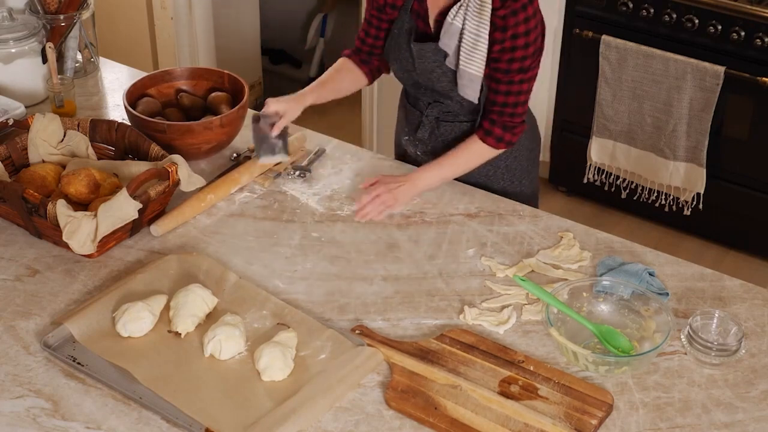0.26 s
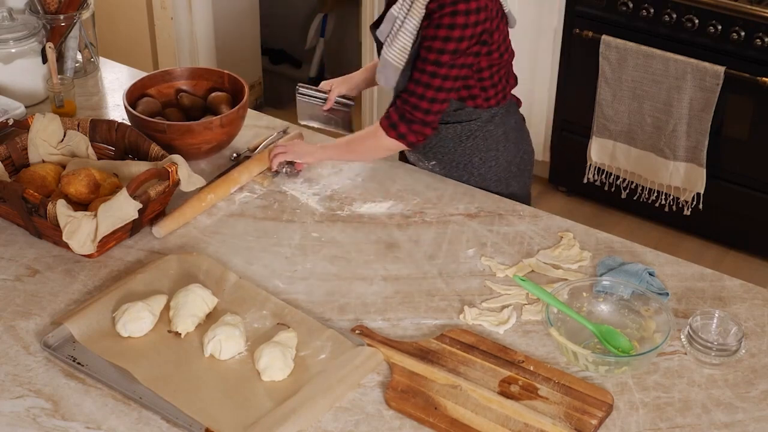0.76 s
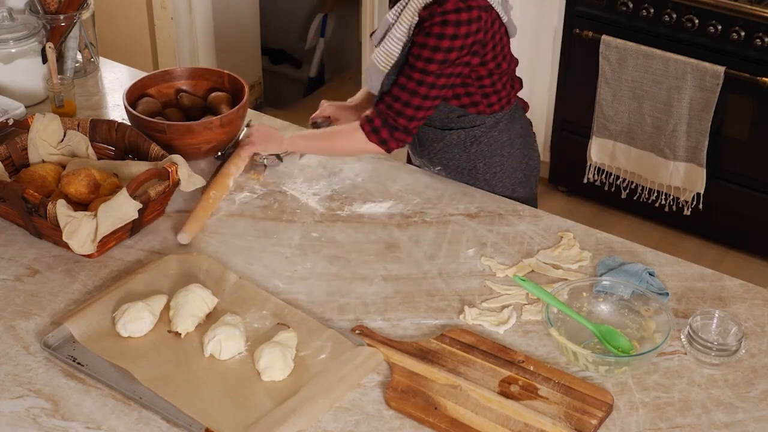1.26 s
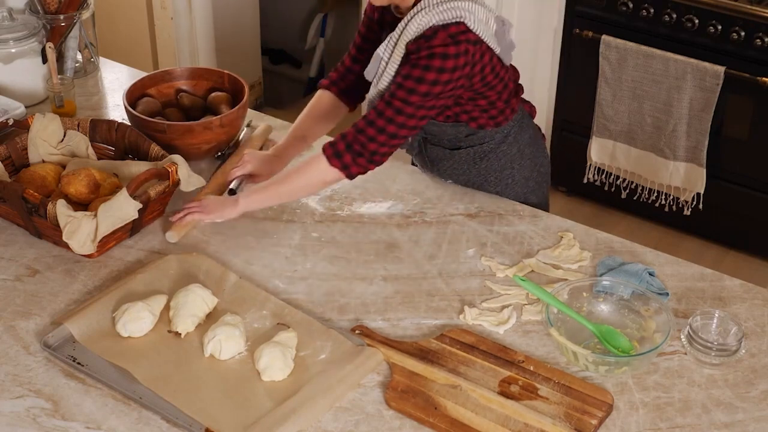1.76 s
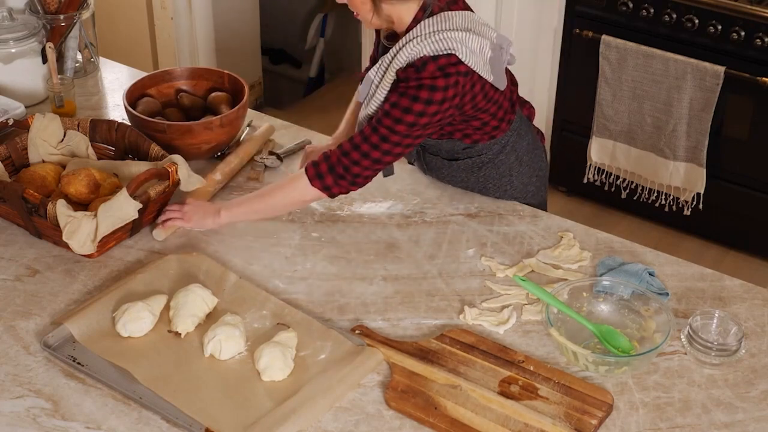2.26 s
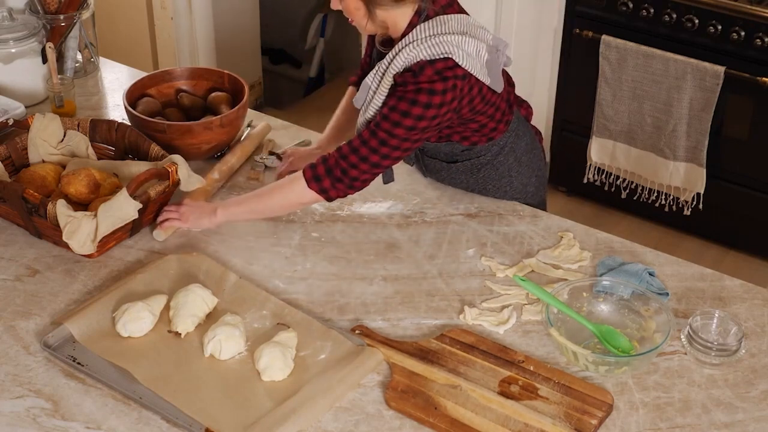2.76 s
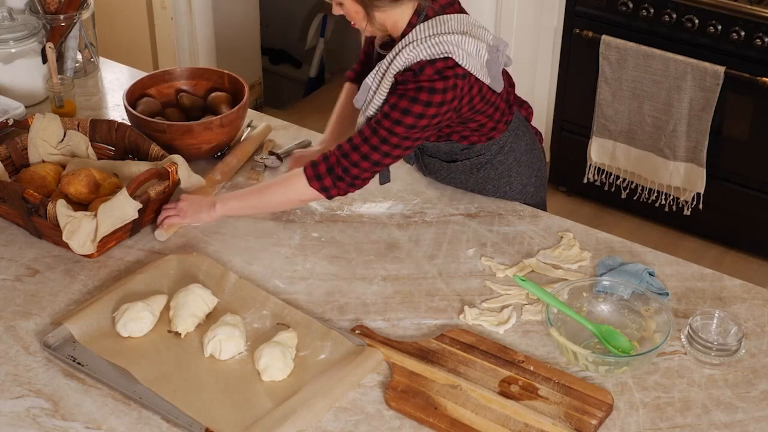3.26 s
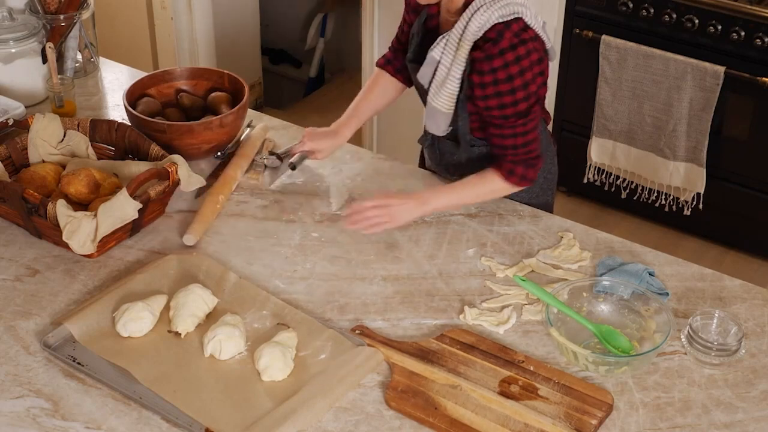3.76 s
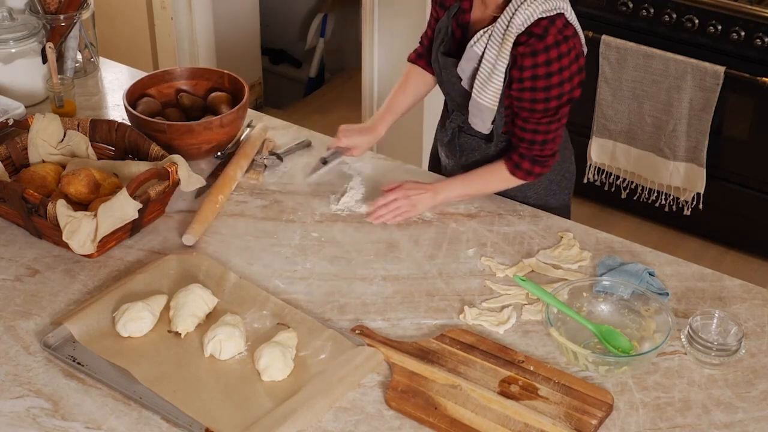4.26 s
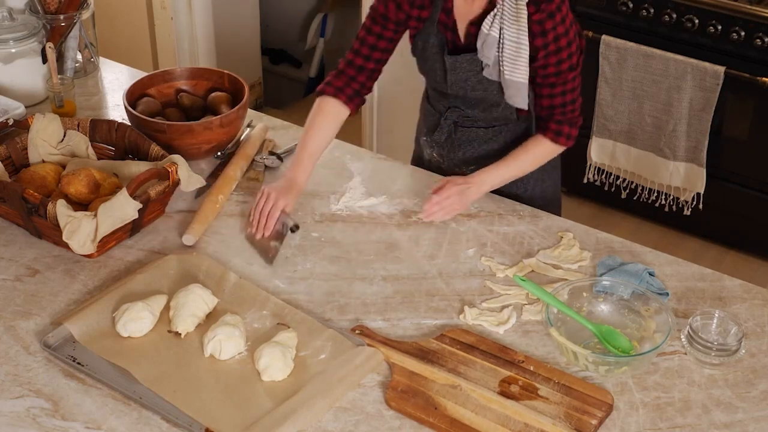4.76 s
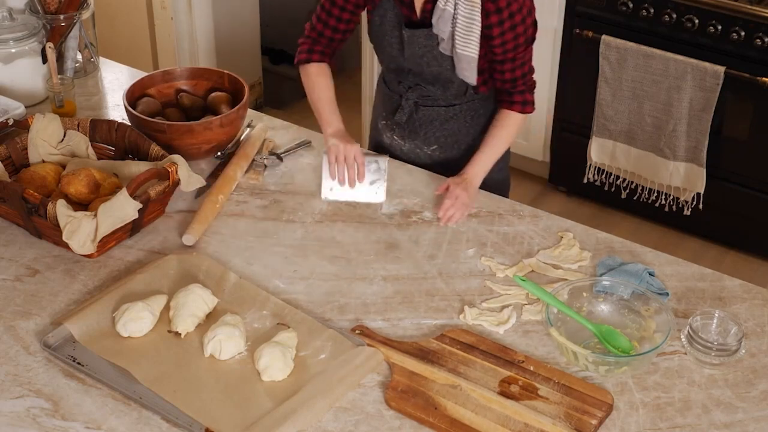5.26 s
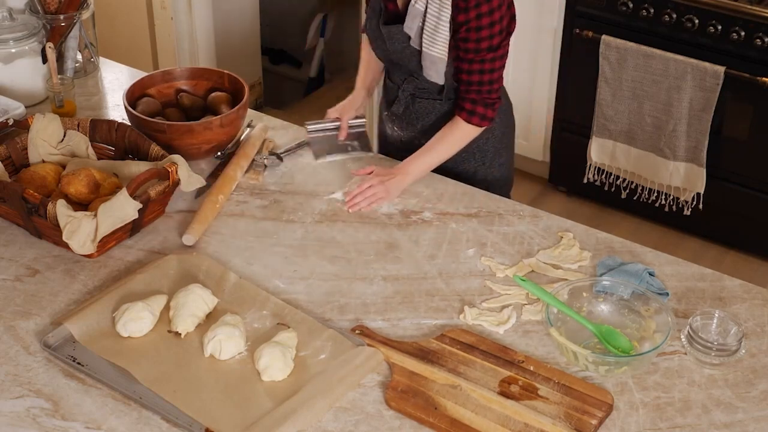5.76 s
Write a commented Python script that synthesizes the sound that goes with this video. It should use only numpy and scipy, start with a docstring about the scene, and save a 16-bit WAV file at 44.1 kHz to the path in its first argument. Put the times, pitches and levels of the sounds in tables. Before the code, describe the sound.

Faint scraping and ticks, one loud woody knock with a steel clink, then sharp metallic clacks and gritty flour scrapes over a low appliance hum.

```python
"""Bench scraper on a stone countertop

A steel blade gathers flour in a small kitchen: modal clacks, corner then edge, precede hissing drags.
The drags are friction noise, made of random micro-slips that also excite the modes of the pressed blade.
A wooden rolling pin gives a hollow modal knock with a clink of steel; ticks, bumps and squeaks fall between.
An appliance hums underneath, and a dense decaying reverberation joins all the work on the counter."""
import sys
import numpy as np
from scipy import signal
from scipy.fft import rfft, irfft
from scipy.io import wavfile
from scipy.ndimage import uniform_filter1d

SR = 44100
rng = np.random.default_rng(int(sys.argv[2]) if len(sys.argv) > 2 else 0)


def waveform_to_disk(signal):
    """Save audio, clipped to [-1, 1], as 16-bit WAV at the path in sys.argv[1]."""
    frames = np.transpose(np.atleast_2d(signal))
    scaled = np.clip(frames, -1, 1) * 32767
    samples = np.round(scaled).astype(np.int16)
    wavfile.write(sys.argv[1], SR, samples)


N = 265077
HALF = SR // 2  # samples in half a second, the length of every struck sound
T = np.arange(HALF) / SR  # its time axis, s
EDGE_HZ = 15900  # upper band limit


def amp(db):
    """Level law: decibels to amplitude gain."""
    return 10 ** (np.asarray(db) / 20)


def unit(x):
    """Normalisation: scales to rms 1."""
    return x / np.sqrt(np.mean(x ** 2) + 1e-20)


def read(points, hz):
    """Interpolation: reads a table on a log-frequency axis, held constant beyond its ends."""
    f, value = np.transpose(points)
    return np.interp(np.log(hz + 1), np.log(f + 1), value)


def add(mix, s, sound):
    """Superposition: adds a sound to the mix in place, from time s."""
    part = mix[round(s * SR):][:len(sound)]
    part += sound[:len(part)]


def colour(x, spectrum, tilt_db=0):
    """Spectral shaping: filters x, with a tilt in dB per octave above 300 Hz; rms 1."""
    hz = np.fft.rfftfreq(len(x), 1 / SR)
    gain_db = read(spectrum, hz) + tilt_db * np.log2(np.maximum(hz, 300))
    return unit(irfft(rfft(x) * amp(gain_db), len(x)))


def die_away(x, t60s):
    """Frequency-dependent damping: each band of x decays at its own rate."""
    hz, t, z = signal.stft(x, SR, nperseg=256)
    decay = amp(-60 * t / read(t60s, hz)[:, None])
    return signal.istft(z * decay, SR, nperseg=256)[1][:len(x)]


def fade(t60):
    """Exponential decay: a fall of 60 dB in t60 seconds."""
    return 1000. ** (-T / t60)


def noise():
    """Broadband excitation: half a second of white noise."""
    return rng.standard_normal(HALF)


def ring(modes, tilt_db=0, length=1):
    """Modal synthesis: damped sines of a struck body, tilted in dB per octave about the median mode."""
    middle = np.median(modes, axis=0)[0]
    out = np.zeros(HALF)
    for hz, db, t60 in modes:
        level = amp(db + tilt_db * np.log2(hz / middle))
        out += level * fade(t60 * length) * np.sin(2 * np.pi * (hz * T + rng.random()))
    return out


def shimmer(t60, low_hz=2200, count=70):
    """Modal crowding: random lines for the upper modes of thin steel, rms 1 before the decay."""
    lines = np.zeros(HALF // 2 + 1, complex)
    place, phase = rng.random((2, count))
    bins = ((low_hz + place * (EDGE_HZ - low_hz)) * HALF / SR).astype(int)
    lines[bins] = rng.random(count) ** 2 * np.exp(2j * np.pi * phase)
    return unit(irfft(lines, HALF)) * fade(t60)


def grit(per_s, spread_db, smooth):
    """Micro-slip friction: many tiny slips of uneven size over a smooth rub."""
    sizes = amp(spread_db * np.minimum(rng.exponential(1, N), 4)) * rng.choice([-1, 1], N)
    slips = unit(sizes * (rng.random(N) < per_s / SR))
    return unit(slips + smooth * rng.standard_normal(N))


def wander(x, depth_db):
    """Moving contact: narrow resonances come and go as it slides along the edge; depth is rms."""
    z = signal.stft(x, SR, nperseg=1024, noverlap=768)[2]
    patches = uniform_filter1d(rng.standard_normal(z.shape), size=3, axis=0)  # across frequency
    patches = unit(uniform_filter1d(patches, size=24, axis=1))  # across time
    return unit(signal.istft(z * amp(depth_db * patches), SR, nperseg=1024, noverlap=768)[1][:N])


# relative spectrum of the kitchen's background: f/Hz, density level/dB
AIR = [(10, -73), (28, -4.5), (55, -5), (90, -15.5), (140, -17.5), (200, -19.5), (450, -20), (1000, -29),
       (2500, -37), (10000, -42), (16000, -43.5)]


def background(hum_hz=120, hum_db=-58, waver_db=2, air_db=-54, drift=0.0204):
    """Amplitude and frequency modulation: a wavering mains hum over low rumble and faint hiss."""
    swell, sway = (unit(uniform_filter1d(x, size=4000)) for x in rng.standard_normal((2, N)))
    turns = np.cumsum(hum_hz * (1 + drift * sway)) / SR
    hum = np.sqrt(2) * amp(waver_db * swell) * np.sin(2 * np.pi * turns)
    air = colour(rng.standard_normal(N), AIR)
    return amp(air_db) * air + amp(hum_db) * hum


ATTACK_S, RELEASE_S = 0.023, 0.023  # the edge settles on the stone and lifts off it
SPEED_POWER = 1.46  # how pointed the arch of speed is
RASP_FOLLOWS = 0.71  # share of the swell that the rasp follows


def stroke(start, length, fastest, hiss_db, rasp_db, swell_db):
    """Speed dependence: hiss and rasp follow the hand as it speeds up and slows. Returns both gains."""
    t = np.arange(N) / SR - start
    arch = np.interp(t / length, [0, np.clip(fastest, .05, .95), 1], [0, np.pi / 2, np.pi])
    slow_db = swell_db * (abs(np.sin(arch)) ** SPEED_POWER - 1)  # 0 dB where the hand is fastest
    touch = np.clip(t / ATTACK_S, 0, 1) * np.exp(-np.maximum(t - length, 0) / RELEASE_S)
    return touch * amp([hiss_db + slow_db, rasp_db + RASP_FOLLOWS * slow_db])


# strokes of the blade: start t/s, length t/s, share of the length at which it moves fastest,
#   flour hiss level/dB and edge rasp level/dB (each before its common trim),
#   swell from the ends to the fastest point level/dB (negative: a dip; the rasp takes a share)
STROKES = [(0.0, 0.35, 0.77, -56, -57, 8), (0.997, 0.22, 0.41, -51.5, -52.5, 5),
           (1.371, 0.21, 0.87, -66, -65, -9), (1.853, 0.15, 0.17, -61.5, -53, 8.5),
           (2.069, 0.24, 0.8, -32, -41, 17), (2.686, .15, 0.84, -36.5, -41, 8.5),
           (3.114, 0.38, 0.56, -34.5, -42, 10.5), (3.776, 0.27, .68, -38, -48.5, 4),
           (4.233, 0.18, 0.65, -34.5, -43.5, 10), (4.804, 0.063, .4, -52, -43, -2),
           (4.921, 0.33, 0.79, -33, -42, 8), (5.251, 0.17, .15, -51, -51, 9),
           (5.464, .23, 0.67, -56, -57.5, 3.5), (5.847, 0.22, .7, -56.5, -60, 5.5)]
# relative spectra of flour hiss and edge rasp: f/Hz, density level/dB
HISS = [(1500, -11), (2800, -7), (4500, -4), (5300, -4.5), (6200, -3), (7500, -7.5), (10000, -2.5),
        (12500, -1.5), (16000, -8.5)]
RASP = [(150, -8.5), (350, -12.5), (700, -4), (900, -5), (1130, -2.5), (1400, -1.5), (1750, -7.5),
        (2300, -6), (3700, -11), (7000, -20), (16000, -54)]
# modes of the blade while pressed and dragged: f/Hz, relative level/dB, t60 t/s
PRESSED = [(1081, -7.5, 0.14), (1108, -5, 0.059), (1214, -8, 0.047), (1275, -4.5, 0.075), (2670, -27, 0.04),
           (3465, -6.5, 0.14), (3830, -18, 0.074)]


def strokes(judder_db=0.92, sing=0.36, flour_db=-2.5, edge_db=-1):
    """Friction-driven resonance: flour hisses, and the edge catches on stone and makes the blade sing."""
    hiss_gain, rasp_gain = sum(stroke(*row) for row in STROKES)
    # slow random unevenness of level, mostly below 100 Hz
    judder_shape = colour(rng.standard_normal(N), [(10, 0), (80, 0), (300, -30), (2000, -70)])
    judder = amp(judder_db * judder_shape)
    hiss = wander(colour(grit(per_s=7000, spread_db=0.5, smooth=0.82), HISS), depth_db=4.0)
    slips = grit(per_s=1600, spread_db=1.0, smooth=0.63)
    blade = unit(signal.fftconvolve(slips, ring(PRESSED))[:N])
    rasp = wander(colour(slips, RASP) + sing * blade, depth_db=6.0)
    return judder * (amp(flour_db) * hiss_gain * hiss + amp(edge_db) * rasp_gain * rasp)


# brief squeaks of the edge: middle t/s, length t/s, level/dB, mean pitch f/Hz
SQUEAKS = [(0.047, 0.089, -56, 1570), (0.294, 0.088, -57, 1550), (4.434, .06, -41.5, 936),
           (5.796, 0.037, -53, 1570)]


def squeaks(jitter=0.034, overtone_db=-9):
    """Stick-slip oscillation: an unevenly wavering pitch with three weaker overtones."""
    out = np.zeros(N)
    for s, length, db, hz in SQUEAKS:
        size = round(length * SR)
        waver = unit(uniform_filter1d(noise(), size=60))[:size]
        turns = np.cumsum(hz * (1 + jitter * waver)) / SR
        tone = sum(amp(overtone_db * k) * np.sin(2 * np.pi * (k + 1) * turns) for k in range(4))
        add(out, s - length / 2, amp(db) * unit(tone) * np.hanning(size))
    return out


# light ticks of handled steel and crumbs: t/s, level/dB, t60 t/s (of the noise)
TICKS = [(0.2534, -47.5, 0.035), (0.289, -41.5, 0.02), (0.455, -47, 0.0046), (0.6872, -41, 0.13),
         (0.717, -45, 0.083), (0.746, -43.5, 0.066), (0.7635, -36.5, 0.069), (.838, -48, 0.053),
         (1.193, -43, 0.11), (1.2036, -28.5, 0.011), (1.881, -53.5, 0.041), (1.9655, -54, 0.014),
         (2.634, -38.5, .015), (3.7188, -47, 0.056)]
# their relative spectrum: f/Hz, density level/dB
TICK = [(300, 13), (1500, -5), (3500, 2.5), (6500, 5.5), (9000, 5), (12500, 3), (16000, -13)]


def ticks(shimmer_db=-10):
    """Impulsive excitation: bright noise bursts, with a trace of steel that rings twice as long."""
    out = np.zeros(N)
    for s, db, t60 in TICKS:
        burst = colour(noise(), TICK) * fade(t60)
        steel = amp(shimmer_db) * shimmer(2 * t60)
        add(out, s, amp(db) * (burst + steel))
    return out


# soft bumps of hand and dough on the counter: t/s, level/dB, pitch f/Hz
BUMPS = [(.29, -37, 39.5), (1.698, -41, 168), (2.081, -40.5, 46.6), (1.203, -33.5, 233), (2.606, -32, 328),
         (4.645, -44.5, 677), (4.665, -32, 168), (4.689, -51, 194), (4.85, -40.5, 162), (5.784, -34.5, 270)]


def bumps(body=0.56):
    """Heavily damped impact: a dull puff of noise around a sine at the same pitch."""
    out = np.zeros(N)
    for s, db, hz in BUMPS:
        puff = colour(noise(), [(hz / 4, -24), (hz, 0), (hz * 2, -13), (hz * 10, -50)])
        thud = unit(puff + body * np.sqrt(2) * np.sin(2 * np.pi * hz * T))
        soft_attack = 1 - np.exp(-T / 0.0021)
        add(out, s, amp(db) * thud * soft_attack * fade(t60=.12))
    return out


# clinks of a steel utensil lying against the pin: t/s, level/dB, brightness level/dB per octave
CLINKS = [(0.6883, -53, 3), (0.905, -34.5, 14), (1.2036, -38.5, 1.5)]
# its modes: f/Hz, relative level/dB (before the brightness), t60 t/s
UTENSIL = [(2740, -4, 0.19), (3217, -1.5, 0.34), (5500, -0.5, 0.067), (6800, -11, 0.17), (9680, -9, 0.13),
           (10600, -12, 0.16), (10800, -21, .2), (12800, -14, 0.14)]


def utensil():
    """Lightly damped modes: the steel utensil rings as the pin jogs it."""
    out = np.zeros(N)
    for s, db, tilt_db in CLINKS:
        add(out, s, amp(db) * ring(UTENSIL, tilt_db))
    return out


# rolling pin knocks: t/s, ring level/dB, clatter level/dB, time until the hand stills the ring t/s
KNOCKS = [(0.766, -41.5, -40, 0.021), (0.9013, -35, -37, 0.009), (0.9038, -15, -27, 0.048),
          (1.2024, -43, -36, 0.045), (1.238, -48, -37.5, 0.048)]
# bending modes of the pin: f/Hz, relative level/dB, t60 t/s (while undamped)
PIN = [(811, 0.5, 0.087), (1786, -6.5, 0.23), (3030, -23, 0.11), (4440, -33, 0.18), (4900, -16.5, 0.052)]
# relative spectrum of its clatter: f/Hz, density level/dB
PIN_CLATTER = [(80, 1), (250, -5), (800, 8), (1400, -4.5), (2600, -7), (5000, -9.5), (7500, -20.5),
               (11000, -15.5), (16000, -27)]


def rolling_pin(still=0.0047):
    """Bending modes under added damping: the wooden bar rings over a clatter until the hand stills it."""
    out = np.zeros(N)
    for s, ring_db, clatter_db, free in KNOCKS:
        clatter = colour(noise(), PIN_CLATTER) * fade(t60=0.15)
        damped = np.exp(-np.maximum(T - free, 0) / still)  # time constant in s
        add(out, s, amp(ring_db) * ring(PIN) * damped + amp(clatter_db) * clatter)
    return out


# blade landings, corner first: t/s, level/dB, brightness level/dB per octave,
#   ring of the modes level/dB (before the trims of ring and shimmer),
#   factor on the decay times of clack and modes (low when dough cushions the blade),
#   delay of the whole edge t/s, its level against the corner/dB, its extra brightness level/dB per octave
LANDINGS = [(1.8061, -31, -8, -14, 0.6, 0.012, 6, 2.5), (2.6047, -30, -2.5, -4, 0.38, 0.0017, 9, -2),
            (3.0462, -16, -1, -2.5, 0.63, .0092, -3, 0), (3.7517, -15, 0.94, -4.5, 0.81, .0079, 1, -1.6),
            (4.217, -18.5, -0.5, -5, 0.77, .0115, 0.5, 3), (4.801, -36, -4, -4.5, 1.3, .046, -13, -5.5),
            (5.7836, -44, -7.5, -11, 1.08, .012, -7, 0)]
# modes of the blade as it strikes the stone: f/Hz, relative level/dB (before the brightness),
#   t60 t/s (before the landing's factor)
BLADE = [(215.7, -16, 0.38), (313, -16, 0.11), (492, -8, 0.28), (980, -10.5, 0.3), (1045, 0, 0.16),
         (1162, -0.5, 0.053), (1303, -3, 0.13), (1392, -4, 0.12), (1452, -3, 0.096), (1618, -6.5, 0.23),
         (2350, -15, 0.28), (2793, -4.5, 0.1), (3900, -11, 0.25), (4060, -3.5, 0.094), (4750, -25, 0.15),
         (5000, -17, 0.26), (6100, -24, 0.1), (6440, -7.5, 0.15)]
# dense clack of steel on stone, relative spectrum before the brightness: f/Hz, density level/dB
CLACK = [(50, -50), (85, -22), (125, 4.5), (170, -7.5), (300, -4.5), (550, -1), (700, -3.5), (1050, -4),
         (1550, -6), (1800, -9.5), (3000, -6.5), (4500, -6.5), (7500, -14.5), (10500, -8.5), (16000, -20)]
# its decay, before the landing's factor: f/Hz, t60 t/s
CLACK_T60 = [(120, 0.12), (500, 0.086), (1500, 0.18), (5000, 0.098), (14000, 0.061)]


def landings(ring_db=-3, shimmer_db=-14, rise=0.00044):
    """Impact excitation: corner and edge each give a dense clack and ring the blade's modes."""
    out = np.zeros(N)
    attack = 1 - np.exp(-T / rise)  # time constant in s
    for s, db, tilt_db, modes_db, length, gap, edge_db, edge_tilt_db in LANDINGS:
        corner = (s, db, tilt_db)
        edge = (s + gap, db + edge_db, tilt_db + edge_tilt_db)
        for at, level, tilt in [corner, edge]:
            clack = die_away(colour(noise(), CLACK, tilt), np.array(CLACK_T60) * [1, length])
            steel = amp(ring_db) * ring(BLADE, tilt, length)
            steel += amp(shimmer_db + 2 * tilt) * shimmer(t60=0.067)
            add(out, at, amp(level) * attack * (clack + amp(modes_db) * steel))
    return out


# the edge bites into bare stone within a stroke: middle t/s, length t/s, peak level/dB
BITES = [(2.175, 0.073, -42), (2.246, 0.078, -39.5), (2.726, .018, -38), (2.764, 0.028, -37),
         (4.427, 0.087, -37.5), (5.192, 0.079, -32.5)]
# relative spectrum of its slips: f/Hz, density level/dB
BITE = [(300, -13.5), (700, -7), (1000, 0.5), (1300, 0), (1700, -7), (3600, -7.5), (7000, -15.5),
        (16000, -43)]


def bites(sing=0.62):
    """Unlubricated friction: where no flour lies under the edge, coarse slips drive the blade harder."""
    gain = np.zeros(N)
    for s, length, db in BITES:
        add(gain, s - length / 2, amp(db) * np.hanning(round(length * SR)))
    slips = grit(per_s=1000, spread_db=0.5, smooth=0.56)
    blade = unit(signal.fftconvolve(slips, ring(PRESSED))[:N])
    return gain * unit(colour(slips, BITE) + sing * blade)


# reverberation of the kitchen: f/Hz, t60 t/s
ROOM_T60 = [(150, 0.44), (500, 0.39), (1200, 0.4), (3000, 0.4), (7000, 0.36), (15000, 0.11)]


def kitchen(x, delay=0.017, build=0.0023):
    """Reverberation: random reflections build up after a delay and die away band by band."""
    taps = rng.choice([-1., 1.], HALF) * (rng.random(HALF) < 4000 / SR)  # about 4000 per second
    tail = die_away(taps, ROOM_T60) * np.clip((T - delay) / build, 0, 1)
    return signal.fftconvolve(x, tail / np.linalg.norm(tail))[:N]


def scene():
    """Direct and reverberant sound: all the work on the counter shares one room, over the background."""
    scrapes = strokes() + squeaks() + bites()
    hits = ticks() + bumps() + landings()
    pin = utensil() + rolling_pin()
    room = kitchen(amp(-13.0) * hits + amp(-10.5) * pin + amp(-12) * scrapes)
    return (hits + pin + scrapes + room + background())[None]


def record(dry):
    """Band limiting: a linear-phase low-pass filter for the recorder."""
    lowpass = signal.firwin(511, EDGE_HZ, window=("kaiser", 9), fs=SR)
    return signal.oaconvolve(dry, lowpass[None], "same")


dry = scene()
out = record(dry)
waveform_to_disk(out)
```